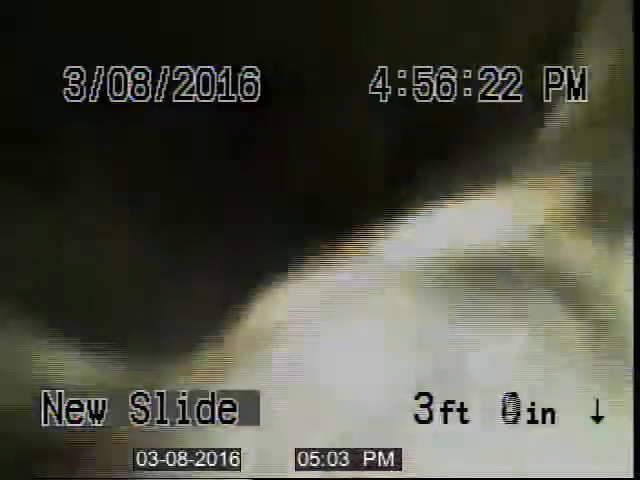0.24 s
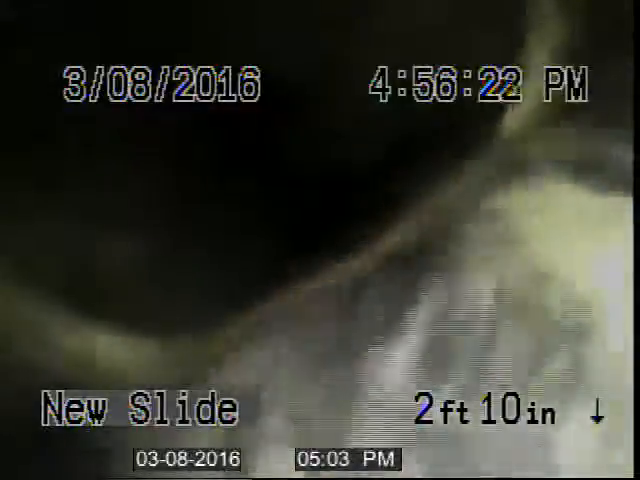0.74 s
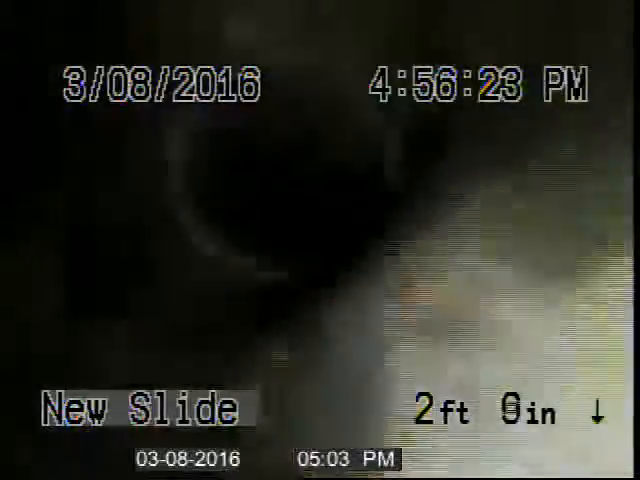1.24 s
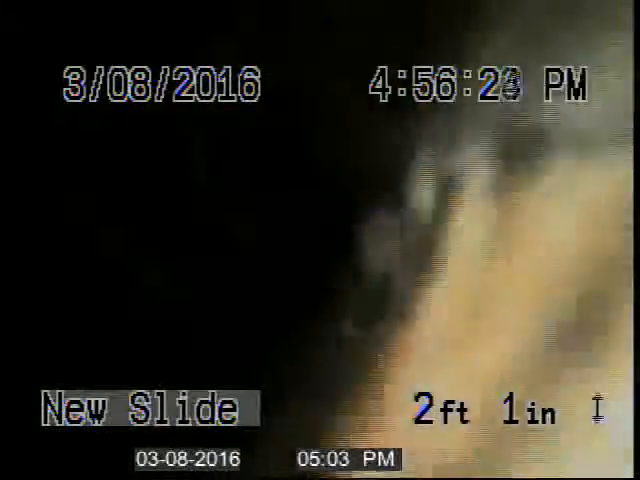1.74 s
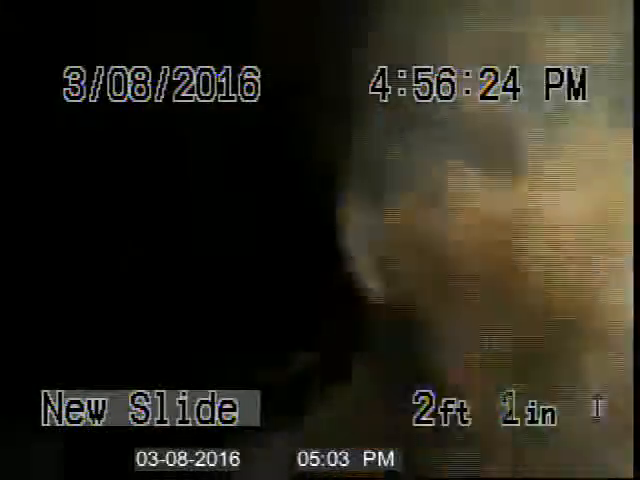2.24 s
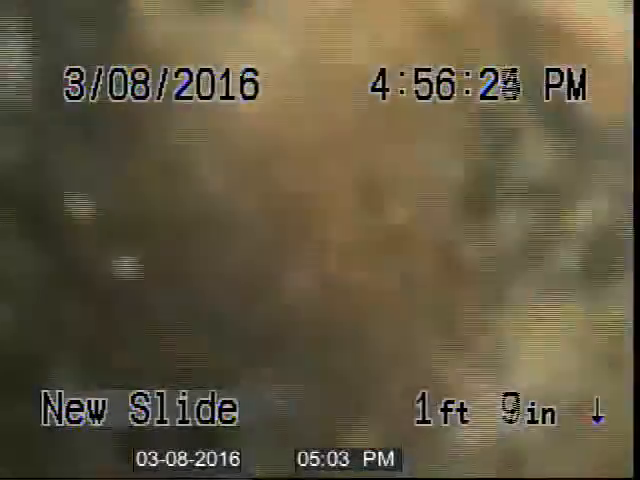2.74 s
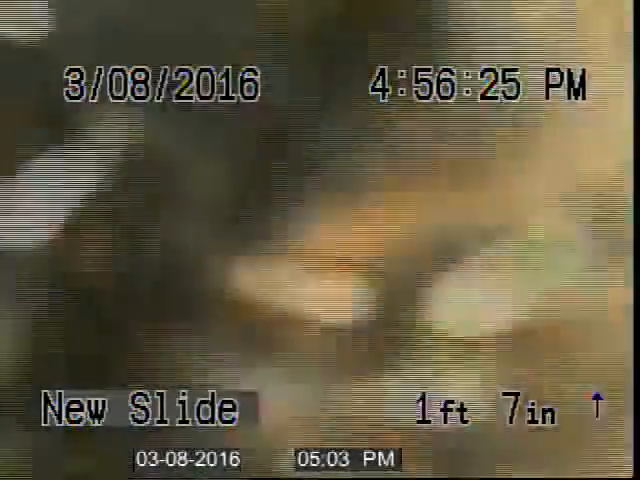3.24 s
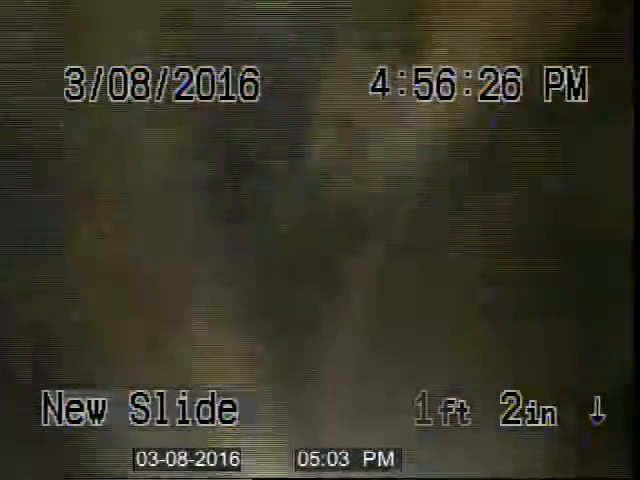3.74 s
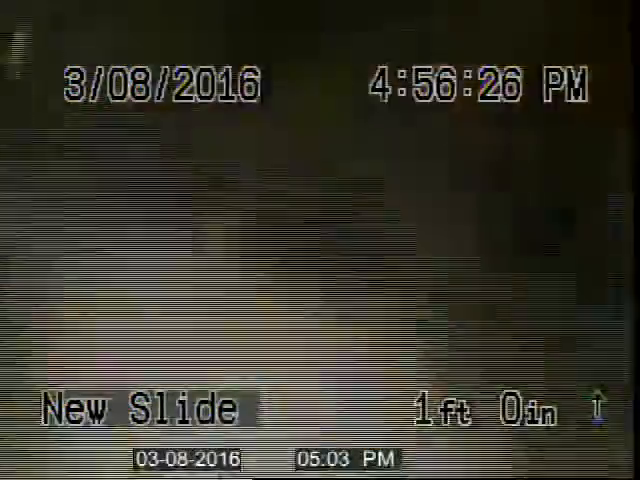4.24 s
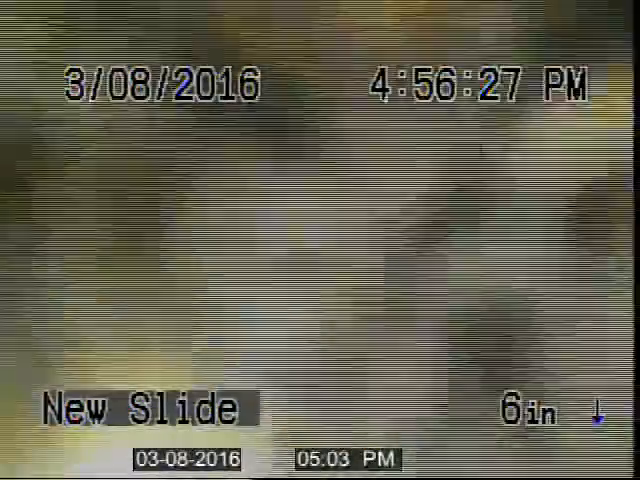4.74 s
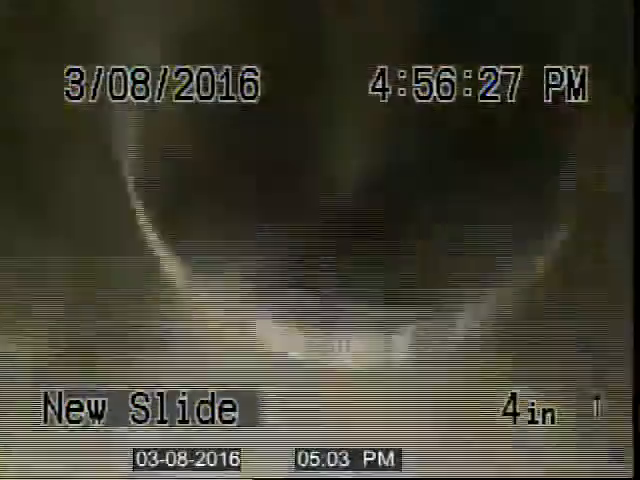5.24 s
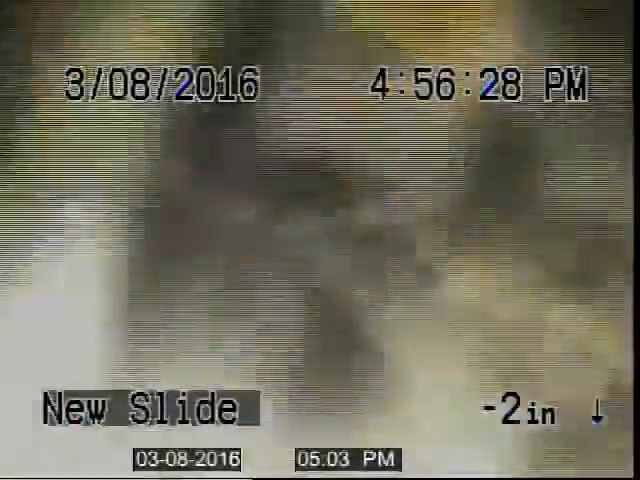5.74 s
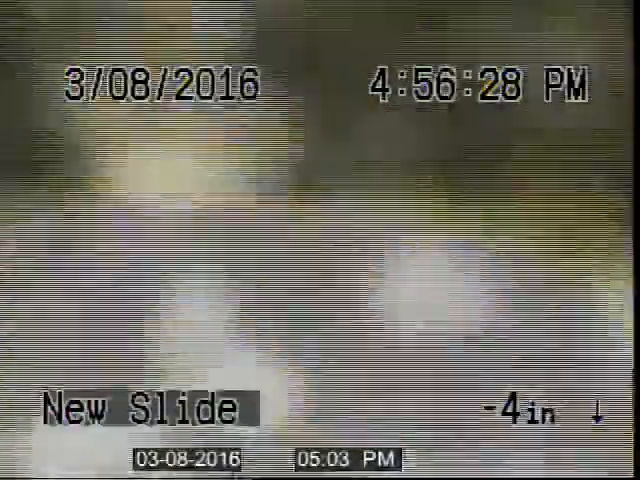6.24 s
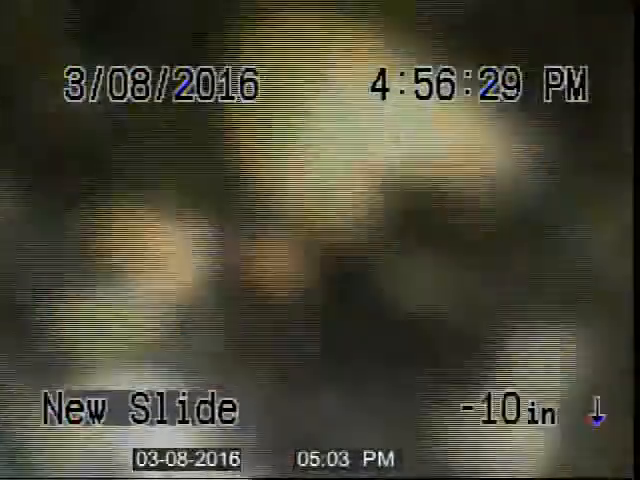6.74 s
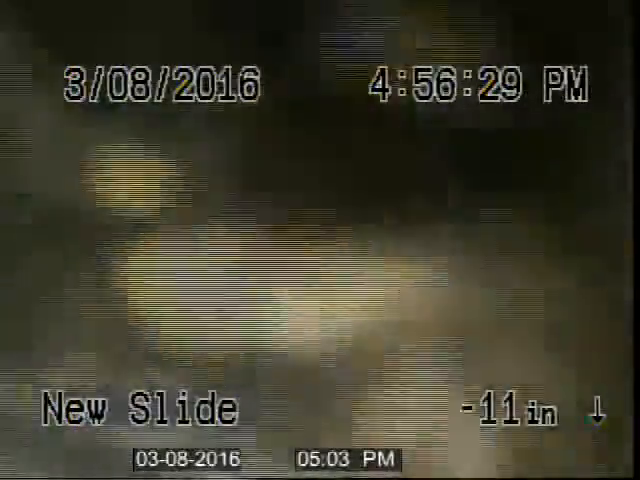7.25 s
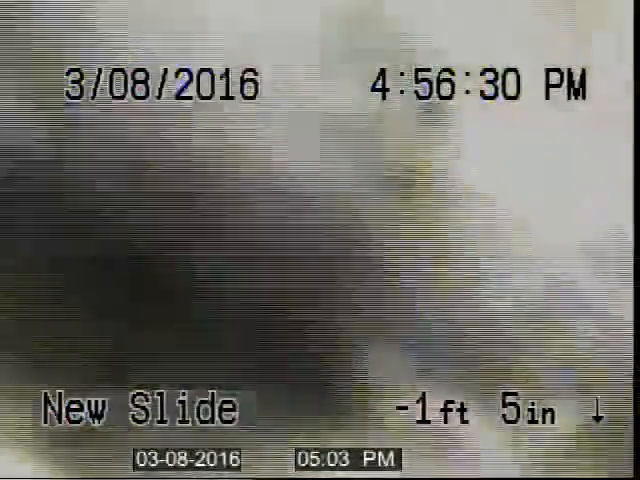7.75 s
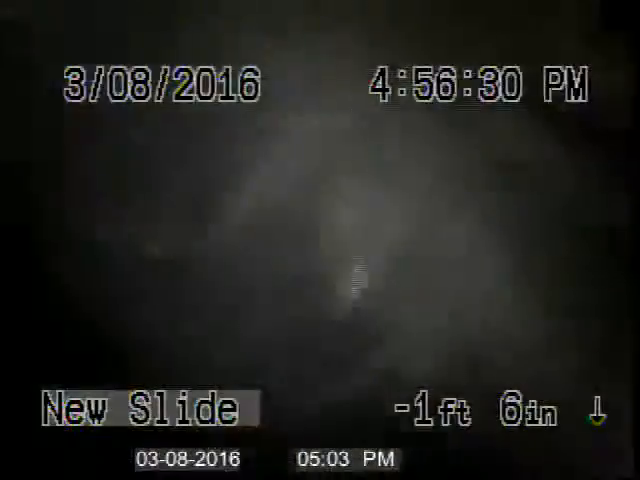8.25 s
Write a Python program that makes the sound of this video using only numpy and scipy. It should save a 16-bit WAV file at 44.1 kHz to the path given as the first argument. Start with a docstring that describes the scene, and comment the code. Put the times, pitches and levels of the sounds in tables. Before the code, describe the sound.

Eight uneven drags of cable over a pipe rim, each a rounded swell of rumble and coarse scraping with a quieter slide between. The second pull is the harshest and full of gritty catches. Light taps come early; a loud knock with a softer rebound strikes past six seconds, then the coil drones in short bursts. It is dry and close, dull in the treble, over faint electronic hiss.

```python
"""Over recorder hiss, faint crackle and thin whine, a stiff cable is hauled from a drain, about a pull a second.
From the start, noisy impulses for its slips over the rim ring the modes of reel, cable body and rasping jacket.
Snags on grit are short noise swells through bright modes; the first knock, crunches ringing the cable, soon follows.
The coil judders once near two seconds, more often late on: a train of jerks rings its low modes.
Late on the jacket squeaks twice, as dense ticks through one narrow mode."""
import sys
import numpy as np
from scipy import signal
from scipy.fft import rfft, irfft, next_fast_len
from scipy.io import wavfile
from scipy.ndimage import uniform_filter1d, map_coordinates

SR = 44100
rng = np.random.default_rng(int(sys.argv[2]) if len(sys.argv) > 2 else 0)


def put_to_file(sound):
    """Save the sound as 16-bit audio at rate SR, in the file named by the first command-line argument."""
    columns = np.atleast_2d(sound).T  # one column per channel
    safe = np.clip(columns, -1, 1)
    whole_steps = np.round(safe * 32767)
    wavfile.write(sys.argv[1], SR, whole_steps.astype(np.int16))


N = 374409


def amp(db):
    """Decibels to gain."""
    return 10 ** (np.asarray(db) / 20)


def unit(x):
    """Scale to rms 1."""
    return x / np.sqrt(np.mean(x ** 2) + 1e-20)


def wobble(rate):
    """A smooth random curve, rate knots a second."""
    knots = rng.standard_normal(int(N * rate / SR) + 4)
    return map_coordinates(knots, [np.arange(N) * rate / SR])


def filtered(x, response):
    """x shaped by a gain that is a function of frequency in Hz."""
    size = next_fast_len(N + SR // 2)
    return irfft(rfft(x, size) * response(np.fft.rfftfreq(size, 1 / SR)), size)[:N]


def coloured(x, points):
    """x through a spectrum of (frequency [Hz], level [dB]) points, at rms 1."""
    f, db = np.transpose(points)
    return unit(filtered(x, lambda hz: amp(np.interp(np.log(hz + 1), np.log(f + 1), db))))


def ring(modes, size=16384):
    """Causal impulse response, of energy 1, of a set of steep-sided resonances."""
    hz = np.fft.rfftfreq(size, 1 / SR)
    power = sum(amp(db) ** 2 / (1 + (2 * (hz - centre) / width) ** 2) ** 2
                for centre, width, db in modes)
    # folding the cepstrum forward in time gives the minimum-phase response
    cepstrum = irfft(np.log(power + 1e-12) / 2)
    cepstrum[1:size // 2] *= 2
    cepstrum[size // 2 + 1:] = 0
    response = irfft(np.exp(rfft(cepstrum)))
    return response / np.linalg.norm(response)


def resonate(x, modes):
    """x ringing through the resonances."""
    return signal.fftconvolve(x, ring(modes))[:N]


def ticks(rate, scatter_db):
    """Impulses at random times, rate a second on average, of either sign and uneven size, at rms 1."""
    happens = rng.random(N) < rate / SR
    sign = rng.choice([-1, 1], N)
    size = amp(scatter_db * np.clip(rng.standard_normal(N), -2, 2))
    return unit(happens * sign * size)


def steady(x, seconds):
    """x with its slow level held at 1 and its fast grain kept."""
    size = max(int(seconds * SR), 2)
    slow_power = uniform_filter1d(uniform_filter1d(x ** 2, size), size)
    return x / np.sqrt(np.abs(slow_power) + 1e-9)


def add(out, s, sound):
    """Mix a sound into out, starting s seconds in."""
    part = out[max(round(s * SR), 0):][:len(sound)]
    part += sound[:len(part)]


def burst(contact, modes):
    """A noisy crunch with the given envelope rings the modes; its loudest 10 ms have rms 1."""
    hit = signal.fftconvolve(contact * rng.standard_normal(len(contact)), ring(modes))
    return hit / np.sqrt(uniform_filter1d(hit ** 2, SR // 100).max())


def swell(peak_s, rise_s, fall_s):
    """Effort in dB: a rounded rise to 0 at the peak and a rounded fall."""
    ease_db, roundness = 20.5, 2.06  # drop one rise or fall away from the peak; exponent of the curve
    t = np.arange(N) / SR - peak_s
    return -ease_db * np.minimum(np.maximum(-t / rise_s, t / fall_s), 10) ** roundness


def electronics():
    """The recorder's circuits sum shaped noise, crackling ticks, a low flutter and steady sines."""
    # spectrum of hiss and crackle: (frequency [Hz], level [dB])
    hiss_spectrum = [(290, -39), (500, 0.5), (974, 0), (1340, -1), (1600, -3), (5230, -9), (5590, -8),
                     (7600, -9.5), (10100, -8), (12100, -27), (15800, -62), (22000, -120)]
    # steady whistles: (frequency [Hz], rms level ahead of a 4.5 dB cut [dB])
    whistles = [(5631, -76.5), (5674, -71), (7074, -77), (9749, -59)]
    flutter_spectrum = [(6, -14.0), (20, -6), (35, -9.5), (70, -6.5), (200, -33), (600, -38.5), (1500, -74)]
    t = np.arange(N) / SR
    hiss = amp(-61) * coloured(rng.standard_normal(N), hiss_spectrum)
    crackle = amp(-64.0) * coloured(ticks(rate=110, scatter_db=4.5), hiss_spectrum)
    flutter_level = amp(-48.0 + 1.4 * wobble(7))
    flutter = flutter_level * coloured(rng.standard_normal(N), flutter_spectrum)
    whine = sum(np.sqrt(2) * amp(db) * np.sin(2 * np.pi * (hz * t + rng.random())) for hz, db in whistles)
    return hiss + crackle + flutter + amp(-4.5) * whine


def effort():
    """Hauls drive gains of reel rumble, cable body and rim rasp; slides and strains move only rumble and body."""
    # hauls that build to a peak and ease off: (peak time [s], rise [s], fall [s],
    # reel rumble level [dB], cable body level [dB], rim rasp level [dB]), ahead of strain and unevenness
    pulls = [(0.07, 0.48, .3, -29, -34, -48), (1.231, .32, 0.2, -26.5, -28, -41),
             (2.421, 0.42, 0.21, -29.5, -33, -48), (3.41, 0.31, .26, -29.5, -35, -48.5),
             (4.44, 0.34, .25, -28, -31.5, -45.5), (5.381, 0.31, .24, -28, -31, -43),
             (6.329, 0.32, 0.32, -26, -32.5, -46.5), (7.34, 0.49, .26, -28.5, -36.5, -51)]
    # light slides between hauls, without biting: (middle time [s], half length [s],
    # reel rumble level [dB], cable body level [dB]), ahead of strain and unevenness
    slides = [(0.593, 0.47, -49.5, -57.5), (1.637, .25, -48.5, -49), (2.782, .16, -48.5, -50),
              (3.836, 0.29, -48, -52.5), (4.893, 0.19, -39.5, -46), (5.718, .3, -46, -56.5),
              (6.744, 0.14, -40, -54), (7.706, 0.17, -42, -56.5), (7.968, .17, -43.5, -53.5),
              (8.295, 0.2, -37.5, -52)]
    # the cable catches and strains, shaking reel and body harder: (time [s], lift [dB])
    strains = [(0.12, 1.5), (1.235, 5.5), (1.735, 7.5), (2.335, 3.5), (4.315, 3), (4.45, 2), (5.185, 3),
               (5.337, 4.5), (6.1, 4), (6.26, 6), (6.42, 5.5), (7.41, 1)]
    strain_s = 0.027  # half length of a strain
    rumble_follows, rasp_follows = 0.75, 1.105  # dB per dB of effort
    rumble, body, rasp = np.zeros((3, N))  # powers
    for s, rise_s, fall_s, rumble_db, body_db, rasp_db in pulls:
        db = swell(s, rise_s, fall_s)
        rumble += amp(rumble_db + rumble_follows * db) ** 2
        body += amp(body_db + db) ** 2
        rasp += amp(rasp_db + rasp_follows * db) ** 2
    for s, half_s, rumble_db, body_db in slides:
        db = swell(s, half_s, half_s)
        rumble += amp(rumble_db + rumble_follows * db) ** 2
        body += amp(body_db + db) ** 2
    t = np.arange(N) / SR
    strain = amp(sum(db * np.exp(-((t - s) / strain_s) ** 2) for s, db in strains))
    uneven = amp(1.36 * wobble(14))  # the hand does not pull quite smoothly
    return np.sqrt(rumble) * strain * uneven, np.sqrt(body) * strain * uneven, np.sqrt(rasp) * uneven


def deepening(x):
    """Raise the lowest rumble steadily through the scene, as cable gathers on the reel."""
    deepens_db_per_s, deep_hz = 0.46, 90
    t = np.arange(N) / SR
    low = filtered(x, lambda hz: 1 / (1 + (hz / deep_hz) ** 10))
    return x + low * (amp(deepens_db_per_s * (t - t.mean())) - 1)


def reel_rumble(slips, shake):
    """Slips ring the reel's low modes while it turns in lurches of its own."""
    # resonances of the reel: (frequency [Hz], width [Hz], level [dB])
    reel_modes = [(30, 43, -17), (64.4, 23, 0.85), (107, 46, -2.5), (139.7, 42, 1.5), (188, 48, -12),
                  (223, 50, -6)]
    lurches = amp(1.62 * wobble(24))
    return shake * lurches * steady(deepening(resonate(slips, reel_modes)), seconds=0.045)


def cable_body(slips, press, catching):
    """A lightly gliding cable rings softly at two broad modes; pressed hard, its whole body answers."""
    # the cable gliding lightly: (frequency [Hz], width [Hz], level [dB])
    glide_modes = [(270, 95, -3.5), (403, 101, -1)]
    # the whole body under pressure: (frequency [Hz], width [Hz], level [dB])
    body_modes = [(250, 44, -1.5), (314, 190, -3), (389.5, 61.6, 2), (462, 79, -9.5), (536, 284, -19.5)]
    pressed = press ** 2 / (press ** 2 + amp(-52.5) ** 2)  # 0 gliding, 1 pressed hard
    gliding = (1 - pressed) * resonate(slips, glide_modes)
    bearing = pressed * resonate(slips * catching, body_modes)
    return (press + amp(-74.5)) * steady(gliding + bearing, seconds=0.019)


def shifting(x, modes, wander_db):
    """As the contact point moves, neighbouring modes trade strength."""
    out = np.zeros(N)
    for group in (modes[::2], modes[1::2]):
        strength = np.sqrt(sum(width * amp(db) ** 2 for _, width, db in group))
        out += amp(wander_db * wobble(14)) * strength * resonate(x, group)
    return out


def rim_rasp(slips, bite, catching):
    """Each slip over the rim releases a short spray of grit that rasps in the cable."""
    # the rasping cable: (frequency [Hz], width [Hz], level [dB])
    rasp_modes = [(660, 240, 5), (887, 133, 6), (1301, 165, 5), (1689, 240, 1.5), (2120, 112, 1.5),
                  (2270, 246, 1.5), (2910, 172, 1.5), (3026, 67, 1.5), (3980, 63, -5), (4270, 870, -8.5),
                  (5460, 4200, -24), (8040, 3700, -22.5)]
    t = np.arange(SR // 20) / SR
    spray_decay = amp(-60 * t / 0.034)
    spray = np.sqrt(np.abs(signal.fftconvolve(slips ** 2, spray_decay)[:N]))
    grit = unit(spray * ticks(rate=6000, scatter_db=3.0))
    rasp = shifting((grit + amp(-4.5) * slips) * catching, rasp_modes, wander_db=1.0)
    flutter = amp(1.0 * wobble(55))  # the jacket catches
    return (bite + amp(-72)) * flutter * steady(rasp, seconds=0.026)


def dragging():
    """The same random slips over the rim drive reel, cable body and rasp together."""
    shake, press, bite = effort()
    slips = ticks(rate=460, scatter_db=3.5)
    catching = amp(0.64 * wobble(80))  # the cable's jacket grips unevenly
    return reel_rumble(slips, shake) + cable_body(slips, press, catching) + rim_rasp(slips, bite, catching)


def snags():
    """The jacket snags on grit: a bright noisy rasp swells for a moment, then lets go."""
    # snags: (time [s], level of the loudest 10 ms ahead of a 12.5 dB cut [dB])
    snag_events = [(0.004, -29), (0.045, -31.5), (0.065, -31.5), (0.082, -37), (0.983, -49), (1.046, -32.5),
                   (1.0916, -33.5), (1.1333, -28.5), (1.1947, -29), (1.208, -28), (1.2439, -25),
                   (1.255, -27), (1.266, -25.5), (2.4178, -28), (2.521, -36.5), (3.3883, -32.5),
                   (4.246, -32.5), (4.268, -38), (4.316, -33), (4.3352, -30), (4.3993, -30.5),
                   (5.2914, -33), (5.4224, -31.5), (6.326, -33), (6.362, -33.5), (7.195, -35),
                   (7.4939, -38.5)]
    # a snag's resonances: (frequency [Hz], width [Hz], level [dB])
    grit_modes = [(1690, 140, 1), (2090, 150, 1.5), (2310, 610, 2), (2960, 140, 6.5), (3810, 120, 0.5),
                  (4290, 530, -1), (6250, 3100, -21)]
    t = np.arange(SR // 20) / SR
    age = t / 0.0049
    out = np.zeros(N)
    for s, db in snag_events:
        add(out, s, amp(db - 12.5) * burst(age * np.exp(-age), grit_modes))
    return out


def knocks():
    """Each slap on the rim is a crunch that clacks in the cable and thuds in its body; hard ones rebound."""
    # slaps: (time [s], clack level ahead of a 9 dB cut [dB], thud level ahead of a 1 dB lift [dB])
    slaps = [(0.575, -51, -47), (0.852, -50, -40), (0.982, -37, -46), (1.207, -44, -24.5),
             (2.162, -36, -46), (3.755, -50, -42), (4.076, -49, -44), (4.934, -36, -31), (4.995, -38, -41),
             (5.684, -51, -42.5), (6.221, -15.5, -17.5), (6.418, -28.5, -31.5), (7.378, -42, -39)]
    # resonances of a hard clack: (frequency [Hz], width [Hz], level [dB])
    clack_modes = [(462, 1100, 1), (880, 106, 9), (1220, 330, 4), (1720, 92, 5.5), (2204, 170, 2),
                   (2910, 240, 1.5), (4240, 900, -13.5), (6600, 5600, -25)]
    thud_modes = [(360, 170, 0), (490, 140, -8)]
    hard_contact_s, rebound_s = 0.00033, 0.0088  # press-in time of the hardest slap; delay of the rebound
    t = np.arange(SR // 20) / SR
    rebound = (t > rebound_s) * amp(-60 * np.abs(t - rebound_s) / 0.037)
    out = np.zeros(N)
    for s, clack_db, thud_db in slaps:
        hardness = min(amp((clack_db + 18) / 2), 1)
        contact = amp(-60 * t / .03) + hardness ** 2 * rebound
        contact = contact * (1 - np.exp(-t * hardness / hard_contact_s))  # light touches press in slowly
        # a soft contact leaves the high modes quiet
        modes = [(hz, width, db - 3.5 * (1 - hardness) * np.log2(hz / clack_modes[0][0]))
                 for hz, width, db in clack_modes]
        # the crunches start just ahead of the listed time
        add(out, s - .001, amp(clack_db - 9) * burst(contact, modes))
        add(out, s - .002, amp(thud_db + 1) * burst(contact, thud_modes))
    return out


def judder():
    """The coil sticks and slips on the reel at an unsteady rate and drones at its lowest modes."""
    # judders: (start time [s], length [s], level midway [dB], mean slip rate [Hz])
    judder_events = [(2.112, .035, -34.5, 153), (6.438, 0.1, -26, 149.2), (6.556, 0.081, -34, 143),
                     (6.929, 0.15, -30, 150), (7.601, 0.046, -37, 162), (8.179, 0.13, -32, 149.7)]
    # the juddering coil: (frequency [Hz], width [Hz], level [dB])
    coil_modes = [(150, 76, -6), (223.4, 67, -4.5), (297, 25, -26.5), (390, 53, -20.5)]
    attack_s, release_s, grows_db = 0.013, 0.013, 3  # it grows from start to end, then lets go
    t = np.arange(N) / SR
    pace = np.cumsum(np.exp(0.076 * wobble(70))) / SR  # time that runs unevenly
    sizes = amp(3.7 * wobble(100))
    rubbing = amp(-11) * ticks(rate=460, scatter_db=5.5)  # loose rubbing among the regular jerks
    out = np.zeros(N)
    for s, length_s, db, hz in judder_events:
        gate = np.clip(np.minimum((t - s) / attack_s, 1 - (t - s - length_s) / release_s), 0, 1)
        progress = np.clip((t - s) / length_s, 0, 1)
        level = gate * amp(db + grows_db * (progress - .5))
        jerks = unit(np.diff(np.floor(hz * pace), prepend=0) * sizes)  # one impulse a cycle
        out += level * steady(resonate(jerks + rubbing, coil_modes), seconds=0.024)
    return out


def squeak():
    """The rubbing jacket excites one narrow mode of the cable in wavering spurts."""
    # squeaks: (peak time [s], rise [s], fall [s], level ahead of the wavering [dB], frequency [Hz])
    squeak_events = [(6.53, 0.088, 0.09, -55.5, 1350), (7.99, .14, 0.14, -51.5, 428)]
    out = np.zeros(N)
    for s, rise_s, fall_s, db, hz in squeak_events:
        level = amp(db + swell(s, rise_s, fall_s) + 2.4 * wobble(45))
        mode = [(hz, 53, 0)]  # 53 Hz wide
        out += level * steady(resonate(ticks(rate=1200, scatter_db=7), mode), seconds=.03)
    return out


def scene():
    """Cable and reel reach one microphone, whose treble falls away; the circuits add their own noise."""
    pickup_hz = 10000
    cable = dragging() + snags() + knocks() + judder() + squeak()
    picked_up = filtered(cable, lambda hz: 1 / np.sqrt(1 + (hz / pickup_hz) ** 10))
    return (picked_up + electronics())[None]


def record(dry):
    """The input stage rounds off the loudest peaks and keeps nothing above its band limit."""
    ceiling, top_hz = amp(-13), 12360
    rounded = dry[0] / (1 + (dry[0] / ceiling) ** 6) ** (1 / 6)
    return filtered(rounded, lambda hz: hz < top_hz)[None]


dry = scene()
out = record(dry)
put_to_file(out)
```